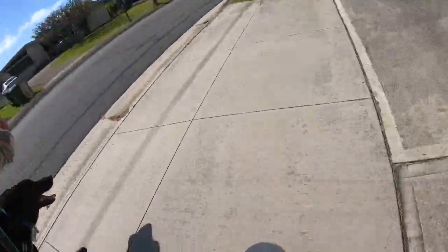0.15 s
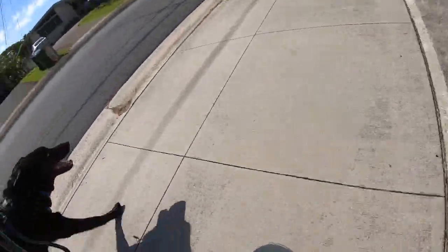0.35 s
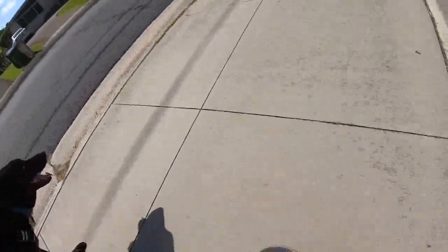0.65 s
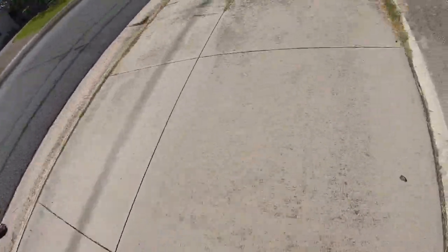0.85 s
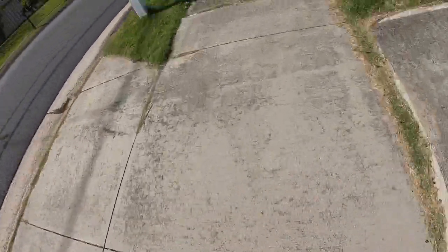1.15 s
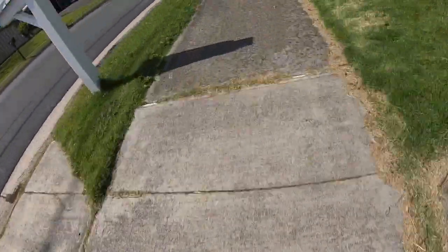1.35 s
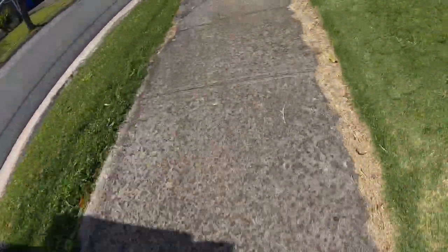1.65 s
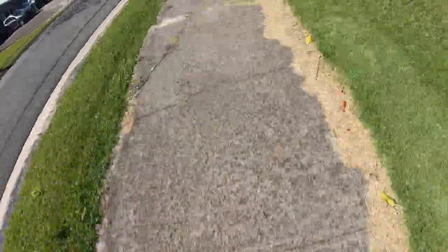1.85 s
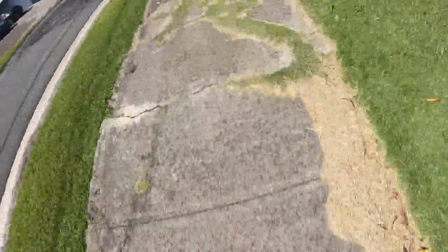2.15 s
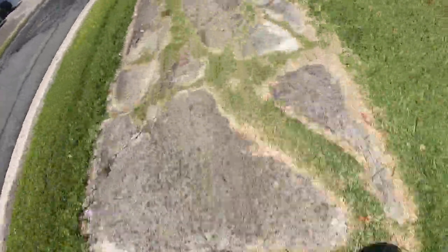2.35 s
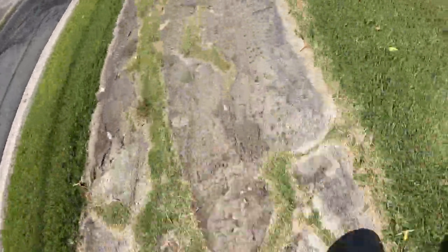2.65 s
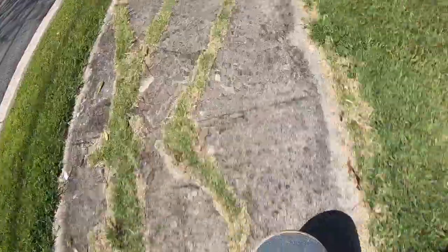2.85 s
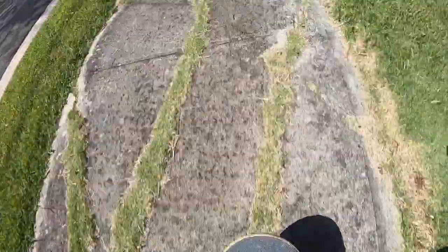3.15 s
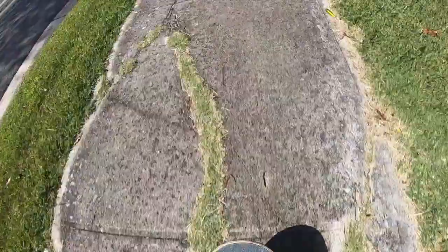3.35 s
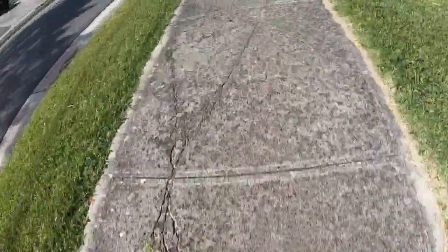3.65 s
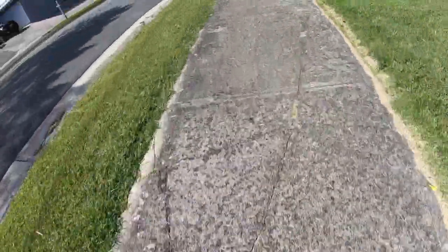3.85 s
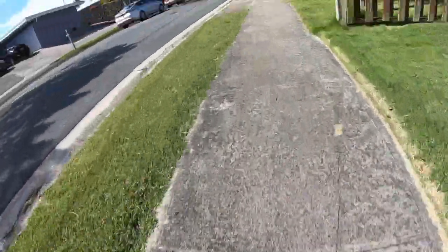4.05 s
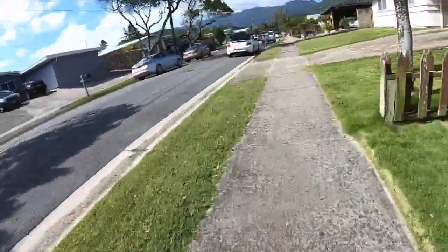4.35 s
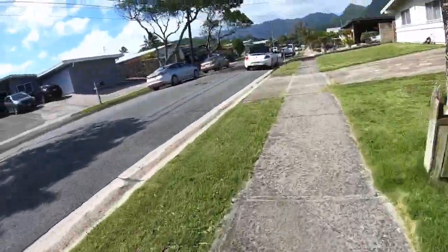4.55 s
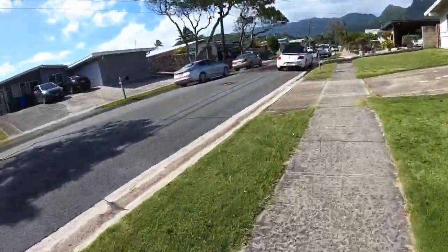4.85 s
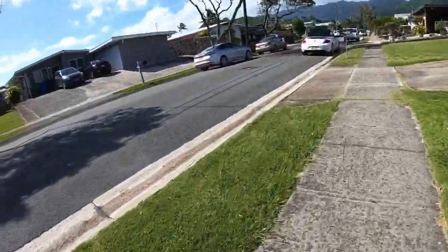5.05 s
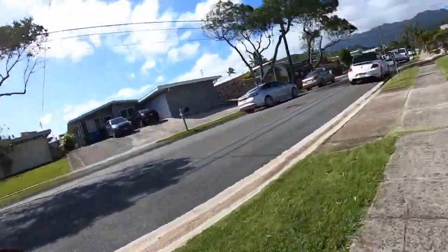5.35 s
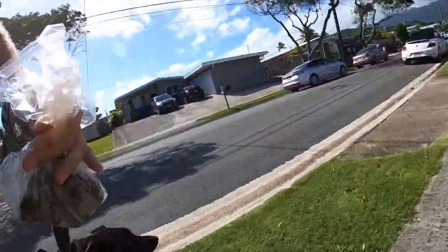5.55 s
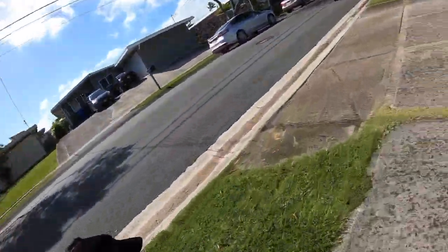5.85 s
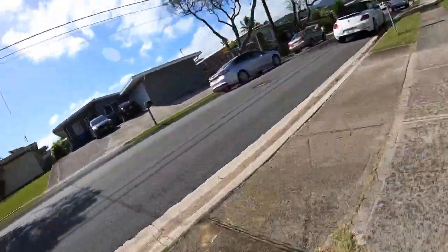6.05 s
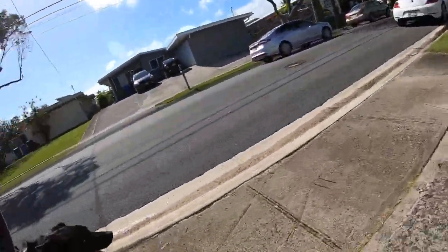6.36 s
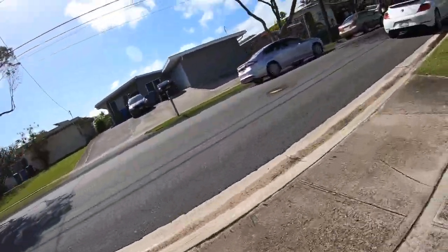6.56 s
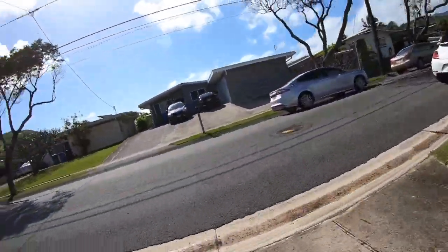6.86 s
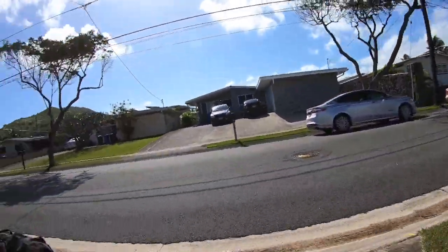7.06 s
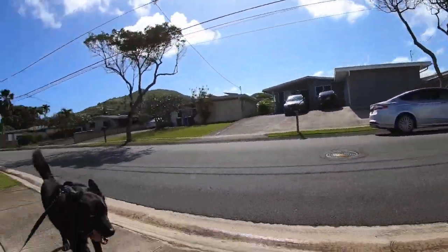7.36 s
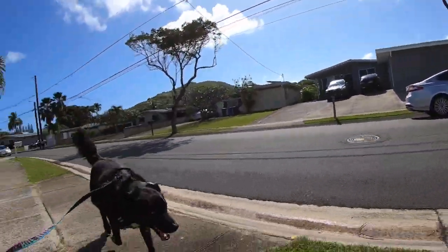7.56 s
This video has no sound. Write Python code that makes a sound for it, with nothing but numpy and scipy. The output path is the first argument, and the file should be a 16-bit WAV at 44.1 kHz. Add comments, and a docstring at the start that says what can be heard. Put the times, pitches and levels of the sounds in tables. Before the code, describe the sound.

Hard skateboard wheels cross rough pavement, heard from just above the board. A quiet start gives way to rapid hollow knocking, gritty rumble and metallic truck chatter over broken slabs for about four seconds. Afterwards it slows into lighter rolling with separate clacks and thin treble ticks like a small clip, sinking almost to wind at the end. Low wind puffs buffet the microphone; distant street air is barely audible.

```python
"""Skateboard wheels on concrete, heard by a camera worn above the board, with wind and a faint street throughout.
From 0.2 s the rough surface shakes the deck, and joints and cracks jolt it: filtered noise and short ringing tones.
Until about 4.2 s the roll is loud and dense; the trucks rattle and the bearings hiss, as noise through resonances.
From 4 s a thin metallic fizz with ticks, perhaps a leash clip, joins in the high treble.
After 5.5 s the rattles and hiss take on a slow-rolling colour, and the roar sinks towards the end."""
import sys
import numpy as np
from scipy import signal
from scipy.fft import rfft, irfft, next_fast_len
from scipy.io import wavfile
from scipy.ndimage import uniform_filter1d, map_coordinates

SR = 44100
rng = np.random.default_rng(int(sys.argv[2]) if len(sys.argv) > 2 else 0)


def put_to_file(sound):
    """Save the sound as 16-bit audio at rate SR, in the file named by the first command-line argument."""
    columns = np.atleast_2d(sound).T  # one column per channel
    safe = np.clip(columns, -1, 1)
    whole_steps = np.round(safe * 32767)
    wavfile.write(sys.argv[1], SR, whole_steps.astype(np.int16))


N = 339570

# Hiss of the bearings before mixing. Each row: time in seconds, level in dB, top of the hiss over that level in dB.
BEARING_HISS = [(0.0, -51, -12), (0.02, -66, -19), (0.56, -65, -24), (0.62, -44.5, -12), (0.79, -63, -28),
                (0.88, -44.5, -20.5), (1.11, -49.5, -11), (1.52, -50.5, -16.5), (2.04, -45, -16),
                (2.06, -63, -3), (2.1, -51.5, -17.5), (2.46, -52, -14), (2.49, -42, -10), (2.51, -54, -10),
                (2.7, -55, -17), (2.85, -58, 0), (2.9, -51, -17), (3.37, -55, -12), (3.79, -53.5, -12),
                (4.12, -56, -11.5), (4.61, -77, 6.5), (5.17, -62.5, -19), (5.28, -67, 0), (5.36, -70, -5),
                (5.64, -65, -13), (5.94, -51, -27.5), (6.69, -51.5, -24), (7.01, -51, -26),
                (7.51, -57.5, -25), (7.7, -50, -28)]
# How far the sound has turned to slow rolling. Each row: time in seconds, share from 0 to 1.
SLOW_SHARE = [(0, 0), (5.55, 0), (5.8, .85), (7.7, .85)]
# Colour of grit on the concrete. Each row: frequency in Hz, gain in dB.
GRIT_COLOUR = [(560, -12.5), (950, -3.5), (1090, -6), (1200, -11), (1580, -17), (1900, -21), (2200, -39),
               (2860, -51), (4840, -120)]
# Colour of low rumble. Each row: frequency in Hz, gain in dB.
RUMBLE_COLOUR = [(60, -50), (110, -10), (165, 0), (285, -9), (400, -35), (900, -140)]


def amp(db):
    """Turn decibels into a plain factor."""
    return 10 ** (np.asarray(db) / 20)


def unit(x):
    """Scale a sound to an rms of 1."""
    return x / np.sqrt(np.mean(x ** 2) + 1e-20)


def curves(rows):
    """One value per sample for each column after the time."""
    s, *cols = np.transpose(rows)
    return [np.interp(np.arange(N) / SR, s, c) for c in cols]


def wobble(rate):
    """A smooth random curve, rate knots a second."""
    knots = rng.standard_normal(int(N * rate / SR) + 4)
    return map_coordinates(knots, [np.arange(N) * rate / SR])


def gate(start, end, fade):
    """1 between two times, with soft edges."""
    t = np.arange(N) / SR
    return np.clip((t - start) / fade, 0, 1) * np.clip((end - t) / fade, 0, 1)


def filtered(x, response):
    """Multiply the spectrum of x by a response of frequency."""
    m = next_fast_len(N + 8192)  # spare room for the ringing
    return irfft(rfft(x, m) * response(np.fft.rfftfreq(m, 1 / SR)), m)[:N]


def colour(points):
    """Response through (Hz, dB) points, read on a log frequency axis."""
    f, db = np.transpose(points)
    return lambda hz: amp(np.interp(np.log(hz + 1), np.log(f + 1), db))


def resonances(modes):
    """Response of damped modes (Hz, width Hz, dB), added with alternating sign."""
    def response(f):
        total = 0
        for k, (centre, width, db) in enumerate(modes):
            damping = 1j * f * width
            total = total + (-1) ** k * amp(db) * damping / (centre * centre - f * f + damping)
        return total
    return response


def twice(modes):
    """Modes passed twice, each pass wider at half the dB, for dark valleys between them."""
    half = resonances([(hz, width * 1.29, db / 2) for hz, width, db in modes])
    return lambda f: half(f) ** 2


def gritty(lumpy_db, rate):
    """Noise of uneven strength, like stone after stone of a rough surface."""
    return unit(amp(lumpy_db * wobble(rate)) * rng.standard_normal(N))


def excite(env, response):
    """Noise shaped by env, then rung through the response at unchanged strength."""
    noise = rng.standard_normal(N)
    return filtered(env * noise, response) / np.std(filtered(noise, response))


def bursts(times, db, lengths, soft):
    """Envelope of short shakes that swell and die; soft rounds the start."""
    env, t = np.zeros(N + SR), np.arange(SR // 5) / SR
    for s, level, length in zip(times, db, np.maximum(lengths, 3e-4)):
        shape = (t / length) ** soft * np.exp(-(t / length) ** 1.2)
        first = max(round(s * SR), 0)
        env[first:][:len(t)] += amp(level) * shape / shape.max()
    return env[:N]


def humps(times, db, lengths, tail):
    """Envelope of bell-shaped swells around their times; tail stretches the fall."""
    env, t = np.zeros(N), np.arange(N) / SR
    for s, level, length in zip(times, db, np.clip(lengths, 1e-3, .03)):
        near = slice(max(int((s - .1) * SR), 0), int((s + .1) * SR))
        late = (t[near] - s) / length
        env[near] += amp(level) * np.exp(-np.where(late > 0, late / tail, late) ** 2)
    return env


def scattered(count, start, level_db, spread_db):
    """Random times after start, with levels a chance step above a level curve, mostly a small one."""
    draw = rng.random((count, 2))
    s = start + draw[:, 0] * (N / SR - start)
    return s, level_db[(s * SR).astype(int)] + spread_db * draw[:, 1] ** 2


def patchy(x, depth_db, size):
    """Random gain in patches about 500 Hz wide and size steps of 6 ms long."""
    z = signal.stft(x, nperseg=512)[2]
    field = uniform_filter1d(rng.standard_normal(z.shape), size=6, axis=0)
    field = uniform_filter1d(field, size=size, axis=1)
    return signal.istft(z * amp(depth_db * unit(field)), nperseg=512)[1][:N]


def surface():
    """Roar of the deck and grit of the concrete in dB; rough patches start and stop abruptly."""
    # Each row: time in seconds, roar of the deck in dB.
    roll_levels = [(0.0, -41), (0.01, -36), (0.14, -54), (0.215, -39), (0.235, -23.5), (0.29, -34),
                   (0.5, -39.5), (0.61, -28), (0.82, -27.5), (0.93, -21.5), (1.46, -19.5), (1.55, -23.5),
                   (2.07, -18), (2.1, -32), (2.18, -14.5), (2.22, -21.5), (2.74, -28.5), (2.75, -21.5),
                   (4.17, -25), (4.23, -31.5), (4.9, -27.5), (4.96, -24), (5.0, -34), (5.22, -28),
                   (5.26, -18.5), (5.32, -25), (5.46, -25.5), (5.49, -33.5), (5.63, -33), (6.13, -37.5),
                   (6.81, -33.5), (6.87, -31.5), (7.06, -38), (7.2, -40.5), (7.3, -39.5), (7.36, -47),
                   (7.5, -41.5), (7.7, -44)]
    # Rough patches of concrete. Each row: start and end in seconds, grit over the roar in dB.
    rough_patches = [(0.215, 0.294, -12), (0.572, 0.654, -6.5), (0.665, 1.238, -12), (1.237, 1.388, -7),
                     (1.419, 1.745, -11), (1.745, 2.88, -7.5), (2.903, 3.448, -13.5), (3.441, 4.2, -9),
                     (4.742, 4.994, -9), (5.237, 5.457, -8.5), (5.536, 5.63, -14), (5.758, 5.81, -22),
                     (6.001, 6.158, -7.5), (6.856, 7.259, -14), (7.251, 7.8, -4.5)]
    smooth_db, edge_s = -19, 0.0061  # grit over the roar between patches; edge of a patch
    roar_db, = curves(roll_levels)
    rough_db = sum((db - smooth_db) * gate(start, end + edge_s, edge_s) for start, end, db in rough_patches)
    return roar_db, roar_db + smooth_db + rough_db


def street():
    """Far traffic and leaves: smooth, faint, coloured noise."""
    # Each row: frequency in Hz, gain in dB.
    street_colour = [(180, -34), (300, -11.5), (391, -21.5), (500, 0), (620, 6.5), (760, -14.5), (900, -24),
                     (1280, -32), (1800, -34), (2710, -48.5), (6350, -51), (10000, -81), (13000, -103),
                     (22000, -120)]
    return amp(-44.5) * unit(filtered(rng.standard_normal(N), colour(street_colour)))


def wind():
    """Headwind buffets the microphone: three bands of low noise that swell in random lumps."""
    # Each row: time in seconds, then levels of deep buffet, throb and rumble in dB.
    wind_levels = [(0.0, -43, -22.5, -35), (0.04, -32, -34, -28), (0.09, -22, -28, -34),
                   (0.13, -35, -34, -37.5), (0.43, -25.5, -34, -38.5), (0.47, -33, -31, -42),
                   (0.71, -21.5, -28, -42), (0.77, -29.5, -30, -39), (1.74, -32.5, -38, -42.5),
                   (1.78, -38.5, -29, -35), (2.32, -28, -27, -26), (2.42, -37, -20, -24.5),
                   (2.59, -32.5, -28.5, -37.5), (3.71, -35, -37.5, -24), (3.97, -22, -26, -26.5),
                   (4.14, -33, -31, -35.5), (4.8, -35, -32.5, -33), (5.17, -38.5, -29.5, -39.5),
                   (5.32, -26, -18.5, -21), (5.38, -30.5, -32, -28), (5.68, -50, -29.5, -36),
                   (5.88, -39, -25.5, -37.5), (6.13, -33, -37, -36), (6.199, -29.5, -25, -29),
                   (6.41, -37, -40, -39), (6.47, -32, -37, -32), (6.551, -38, -41, -35),
                   (6.69, -31, -29.5, -33), (6.78, -35, -47, -31), (6.845, -31, -32, -24),
                   (6.9, -33.5, -39.5, -41), (7.61, -37, -42, -41), (7.7, -33, -41, -41)]
    # Colours of the two lower layers. Each row: frequency in Hz, gain in dB.
    buffet_colour = [(8, -40), (18, -8), (45, 0), (70, -4), (120, -24), (200, -70), (500, -140)]
    throb_colour = [(35, -50), (60, -12), (100, 0), (150, -12), (260, -60), (600, -140)]
    gust_rate, own_db, shared_db = 9, 1.5, 1  # knots a second; lumps of each layer and of all layers in dB
    gust_db = shared_db * wobble(gust_rate)
    total = 0
    layers = []
    for tone in (buffet_colour, throb_colour, RUMBLE_COLOUR):
        air = filtered(gritty(own_db, rate=gust_rate), colour(tone))
        layers.append(unit(amp(gust_db) * air))
    for db, layer in zip(curves(wind_levels), layers):
        total = total + amp(db) * layer
    return total


def bumps(steady):
    """Puffs and knocks on the camera, a cycle or two of low push each; the steady wind gives way to them."""
    # Low bumps. Each row: time in seconds, level in dB before the trim below, pitch in Hz before it wavers.
    bump_rows = [(0.04, -16.5, 152.6), (0.089, -20.5, 100), (0.264, -16.5, 100.4), (0.384, -18, 79.5),
                 (0.588, -11, 99.7), (0.615, -18.5, 90), (0.662, -18.0, 99), (0.703, -13.0, 89),
                 (0.741, -17, 80.64), (0.852, -13.5, 98.8), (0.938, -20, 150.9), (1.108, -21.5, 110.7),
                 (1.134, -17, 89.8), (1.201, -23, 99.3), (1.227, -24.0, 90.4), (1.292, -21, 109.7),
                 (1.367, -19.5, 100), (1.405, -18, 139), (1.602, -18, 140.9), (1.768, -19, 109.9),
                 (1.794, -21, 120.6), (1.834, -14, 110), (1.898, -20, 139), (1.937, -18.5, 120.4),
                 (2.071, -10, 120.1), (2.124, -12, 120.4), (2.18, -13, 139.3), (2.273, -16, 139.6),
                 (2.318, -15, 109.8), (2.351, -13.5, 130.2), (2.412, -17.5, 139.8), (2.433, -14, 160),
                 (2.467, -19, 119.7), (2.687, -21.5, 140), (2.763, -14, 110), (2.79, -20, 109.8),
                 (2.886, -20, 200), (2.967, -22, 110), (2.997, -16.5, 120.1), (3.119, -17, 130.2),
                 (3.164, -18, 149.2), (3.257, -12, 169.9), (3.407, -20, 160.1), (3.467, -12, 180.2),
                 (3.538, -14.5, 150), (3.57, -15, 180.3), (3.61, -6, 179.1), (3.655, -16.0, 179.4),
                 (3.683, -15.0, 189.6), (3.721, -12.5, 170.3), (3.747, -13.5, 150.7), (3.815, -14, 201.1),
                 (3.84, -15, 139.7), (3.862, -15, 199.9), (3.923, -14, 150), (3.946, -16, 109.5),
                 (3.972, -12.5, 139.8), (4.01, -21, 159.6), (4.064, -18.5, 190.7), (4.265, -16, 129.9),
                 (4.333, -18.5, 179.6), (4.364, -17, 120.7), (4.416, -18, 140), (4.694, -15, 120.1),
                 (4.758, -20.5, 210), (4.787, -22, 159.2), (4.834, -13, 138), (4.861, -19.5, 109.6),
                 (4.915, -19, 189), (4.953, -13.5, 160), (5.279, -16.5, 170), (5.309, -14, 99.84),
                 (5.328, -11.5, 150.5), (5.393, -15, 209.2), (5.497, -17, 160.1), (5.61, -14.5, 130),
                 (5.743, -19, 120), (5.844, -15, 99.9), (5.874, -24, 100), (5.918, -14, 99.9),
                 (5.944, -17, 120.4), (6.159, -23, 150), (6.191, -18.0, 120), (6.229, -13, 100),
                 (6.272, -16, 130.2), (6.391, -15, 180), (6.466, -17, 139), (6.598, -16.5, 140),
                 (6.681, -19, 110), (6.705, -13, 200.7), (6.754, -18, 180), (6.844, -14.0, 139.4),
                 (6.912, -23, 109.8), (6.963, -17.5, 120), (6.997, -24.0, 99.8), (7.169, -25.5, 119.7),
                 (7.24, -22, 110), (7.351, -25, 109.6), (7.659, -26.5, 130)]
    length_s, trim_db, calm = 0.0067, -2.5, 1.1  # calm: how far a bump takes the place of the wind
    s, db, pitch_hz = np.transpose(bump_rows)
    hz = np.interp(np.arange(N) / SR, s, pitch_hz) * (1 + 0.0994 * wobble(40))
    push = humps(s, db + trim_db, np.full(len(s), length_s), tail=1.01)
    calmed = steady / np.sqrt(1 + (calm * push / steady.std()) ** 2)
    return push * np.sin(2 * np.pi * np.cumsum(hz) / SR) + calmed


def fizz():
    """Thin treble fizz, made of uneven high noise, with single ticks, loud and faint."""
    # Each row: time in seconds, level of the fizz in dB.
    fizz_levels = [(4.0, -83), (4.7, -90), (5.4, -78.5), (6.2, -81), (7.7, -76.5)]
    # Louder ticks. Each row: time in seconds, level in dB before the trim below.
    tick_rows = [(4.631, -57), (5.127, -60), (5.2277, -63), (5.247, -63), (5.542, -50), (5.751, -73),
                 (6.0204, -53.5), (6.2704, -61), (6.4056, -48), (6.445, -53.5), (6.602, -60.5),
                 (6.605, -52), (6.752, -57), (6.806, -50), (6.8548, -75), (7.114, -59), (7.221, -47.5),
                 (7.4363, -63)]
    # Each row: frequency in Hz, gain in dB.
    thin_colour = [(9500, -120), (11400, -14), (11900, -2), (12400, 0), (13000, -3), (14300, -8),
                   (15700, -11)]
    faint_count, faint_db, spread_db = 40, 13, 4.5  # faint ticks: how many, least level over the fizz, spread
    length_s, trim_db = .0022, -9.0
    fizz_db, = curves(fizz_levels)
    faint = scattered(faint_count, 4.6, fizz_db + faint_db, spread_db)
    s, db = np.hstack([np.transpose(tick_rows), faint])
    steady = gate(4.0, 9, .3) * amp(fizz_db) * unit(filtered(gritty(3.5, rate=90), colour(thin_colour)))
    tick_env = bursts(s - .002, db + trim_db, np.full(len(s), length_s), soft=1.6)
    return steady + excite(tick_env, colour(thin_colour))


def metal(env):
    """Noise shakes the metal of the trucks; at low speed other resonances stand out."""
    # Modes in normal and in slow rolling. Each row: pitch in Hz, width in Hz before twice() widens it, level in dB.
    truck_modes = [(2460, 640, -8.5), (3170, 420, 1.5), (3810, 496, 0), (4810, 540, -6.5), (5680, 410, -9)]
    slow_modes = [(1620, 120, -17), (2230, 120, 2), (3080, 450, -6.5), (4030, 570, -7.5), (4670, 460, -10),
                  (5440, 820, -13), (6600, 1200, -20)]
    turn = curves(SLOW_SHARE)[0] * np.pi / 2
    return excite(env * np.cos(turn), twice(truck_modes)) + excite(env * np.sin(turn), twice(slow_modes))


def bearings():
    """Bearings hiss as uneven noise, partly through the truck's resonances."""
    # Colours of the main hiss and its top. Each row: frequency in Hz, gain in dB.
    hiss_colour = [(1120, -37), (1900, -5), (2040, 0.5), (2210, -1), (2590, -2), (3330, -6), (3930, -9),
                   (4830, -13), (5610, -13), (6800, -29), (8840, -57.5), (15000, -120)]
    hiss_top_colour = [(3650, -29.5), (6200, 1), (7490, 0.5), (8150, 1.5), (8970, -3.5), (10800, -18),
                       (11500, -15), (15000, -49), (22000, -120)]
    slow_ring_db, shake_db = -5, -24  # change of the ringing at full slow share; truck shaking under the grit
    hiss_db, top_db = curves(BEARING_HISS)
    slow = curves(SLOW_SHARE)[0]
    lumps_db = 2.0 * wobble(25) + 0.54 * wobble(150)
    plain = unit(filtered(gritty(3.5, rate=290), colour(hiss_colour)))
    plain = amp(-2.5) * np.cos(slow * np.pi / 2) * plain
    ringing = amp(-10.0 + slow_ring_db * slow) * metal(amp(0.92 * wobble(60)))
    top = unit(filtered(gritty(2.9, rate=350), colour(hiss_top_colour)))
    grit_db = surface()[1]
    shaken = excite(amp(grit_db + shake_db + 2.7 * wobble(120)), colour(hiss_colour))
    hiss = amp(hiss_db + lumps_db) * (plain + ringing + amp(top_db) * top)
    return patchy(hiss + shaken, depth_db=2, size=20)  # the colour drifts


def lingering():
    """Narrow bands of hiss that each wander a little in pitch, flutter, hold and fade."""
    # Each row: start and end in seconds, pitch in Hz, width in Hz, level in dB.
    band_rows = [(.65, .76, 3100, 300, -56), (.67, .78, 2630, 500, -54), (.74, .88, 2300, 250, -55.5),
                 (.8, .89, 2950, 400, -51), (.225, .31, 2007, 1200, -58), (.72, .9, 3360, 400, -71),
                 (1.2, 1.4, 2396, 699, -51), (.66, .74, 6540, 700, -63), (.66, .7, 5700, 200, -65),
                 (.71, .76, 5300, 500, -66), (1.75, 2.04, 2570, 400, -59), (1.8, 2.04, 4100, 900, -58),
                 (2.1, 2.46, 2502, 450, -57), (2.12, 2.22, 4107, 900, -51), (2.22, 2.46, 3847, 800, -54),
                 (2.1, 3.3, 5710, 300, -77), (3.05, 3.5, 3009, 600, -59), (3.86, 4.03, 4244, 500, -60),
                 (2.2, 2.9, 8305, 350, -74), (3.93, 4.04, 3210, 200, -54), (4.08, 4.36, 3100, 300.8, -61),
                 (4.18, 4.35, 4088, 398, -65), (4.12, 4.68, 4916, 130.1, -70.5),
                 (4.18, 4.56, 5540, 260, -67.5), (4.2, 4.35, 2720, 496, -55), (4.2, 4.34, 7900, 900, -73),
                 (4.2, 4.3, 6255, 300, -71), (4.3, 4.6, 3325, 220.3, -65), (4.34, 4.47, 2640, 120, -67),
                 (4.33, 4.58, 2990, 180, -61.5), (4.5, 4.66, 3110, 99.7, -68), (4.44, 4.6, 6000, 350, -67),
                 (4.6, 4.74, 6440, 403, -72), (4.75, 4.97, 1750, 500, -69), (5.25, 5.47, 1775, 550, -47.5),
                 (5.85, 6.08, 3088, 500, -63.5), (5.92, 6.0, 2230, 303, -59.5),
                 (6.01, 6.17, 2190, 300, -56), (6.02, 6.18, 1666, 200, -52), (6.3, 6.92, 2238, 301.4, -74),
                 (7.08, 7.25, 2187, 298, -64), (6.45, 6.68, 2817, 250.4, -75),
                 (6.94, 7.08, 1894, 1009, -54), (7.12, 7.22, 3170, 200, -69), (7.08, 7.7, 4495, 598.2, -70),
                 (7.2, 7.45, 3150, 298.7, -75), (7.44, 7.7, 1460, 250, -56), (7.52, 7.66, 3127, 250, -64)]
    fade_s = .02
    out = np.zeros(N)
    drift = .003 * wobble(14)  # share of the pitch
    flutter = amp(2 * wobble(45) + 1.5 * wobble(10))  # quick and slow wavering in dB
    for k, (start, end, hz, width, db) in enumerate(band_rows):
        i = np.arange(int(start * SR), min(int(end * SR), N))
        noise = rng.standard_normal((2, N // 6))[:, :len(i)]
        slow = signal.lfilter(*signal.butter(3, width / 2, fs=SR), noise[0] + 1j * noise[1])
        own = (i + k * SR // 3) % N  # each band reads another stretch of the wavering
        carrier = np.exp(2j * np.pi * np.cumsum(hz * (1 + drift[own])) / SR)
        band = unit((slow * carrier).real)  # slow noise moved up to the band's pitch
        fade = np.clip(np.minimum(i - i[0], i[-1] - i) / SR / fade_s, 0, 1)
        out[i] += amp(db) * fade * flutter[own] * band
    return out


def trucks():
    """Loose metal parts chatter when shaken: loud shakes, scrapes, and small shakes that follow the hiss."""
    # Loudest rattles. Each row: time in seconds, level in dB before the trims below, brightness in dB.
    rattle_rows = [(0.226, -52, -29), (0.402, -44, -29), (0.8358, -51, -32), (0.893, -26, -24),
                   (1.127, -30.5, -14), (1.159, -36.5, -14), (1.358, -33, -10.5), (1.374, -36, -16),
                   (1.591, -35, -6), (1.74, -32, -28), (1.887, -25.5, -27), (1.945, -41.5, -22),
                   (1.996, -32.5, -19), (2.059, -21.5, -18), (2.1154, -40, -29), (2.229, -34, -29),
                   (2.288, -47, -22), (2.4212, -44, -20), (2.484, -22, -16), (2.5342, -25, -14.5),
                   (2.525, -36.5, -19), (2.578, -42, -14), (2.68, -36, -28), (2.742, -31.5, -18),
                   (2.61, -23.5, -24), (2.771, -38, -23), (2.794, -28.5, -12), (2.842, -36.5, -23),
                   (2.859, -26, -24), (2.919, -30, -22), (2.987, -33, -41), (3.0189, -32, -29),
                   (3.3377, -32, -21), (3.42, -34.5, -15), (3.5144, -28, -28), (3.588, -34, -18),
                   (3.606, -33.5, -17), (3.635, -26, -18), (3.6638, -26, -15), (3.688, -26.5, -19),
                   (3.7524, -34.5, -12), (3.7917, -26, -19), (3.8017, -21.5, -17), (3.835, -18.5, -22),
                   (3.9086, -26, -23), (3.9716, -36, -29), (4.003, -30.5, -27), (4.064, -37, -29),
                   (4.15, -33, -26), (4.165, -35.5, -26), (4.21, -49, 4), (4.331, -36.5, -10),
                   (4.548, -53, -9), (4.632, -53, 1), (4.755, -44, -8), (4.8, -47, -25), (4.905, -42, -19),
                   (4.952, -45, -15), (5.217, -39, -25), (5.244, -46, -21), (5.2601, -44.5, -8),
                   (5.285, -45.5, -25), (5.335, -53, -28), (5.39, -46, -29), (5.443, -45, -29),
                   (5.56, -41.5, -22), (5.622, -40.5, -26), (5.776, -40, -33), (5.797, -48, -35),
                   (6.019, -29.5, -30), (6.05, -40.5, -28), (6.115, -48, -34), (6.15, -46.5, -32),
                   (6.271, -37, -28), (6.388, -35.5, -24), (6.405, -38.5, -20), (6.431, -32.5, -26),
                   (6.446, -33.5, -25), (6.59, -44, -29), (6.605, -23, -22), (6.701, -37, -26),
                   (6.808, -44, -14), (6.854, -28, -32), (7.035, -43, -28), (7.134, -42, -34),
                   (7.152, -45, -34), (7.207, -37.5, -36), (7.2547, -47, -27), (7.325, -46, -30),
                   (7.437, -58, -8)]
    # Longer scrapes over broken concrete. Each row: start and end in seconds, level in dB, brightness in dB.
    scrape_rows = [(0.586, 0.656, -51, -33), (2.04, 2.064, -39.5, -18), (2.415, 2.469, -49, -19),
                   (2.463, 2.499, -43, -19), (2.796, 2.868, -44.5, -9.5), (3.607, 3.625, -48, -14),
                   (3.644, 3.669, -46, -15), (3.805, 3.836, -53, -10), (3.895, 3.94, -53, -14),
                   (5.268, 5.288, -74, 7), (5.771, 5.81, -63, -31), (6.002, 6.155, -62.5, -15),
                   (7.25, 7.301, -59.5, -21), (7.443, 7.486, -60, -22), (7.555, 7.59, -56, -21)]
    # Top resonances. Each row: pitch in Hz, width in Hz before twice() widens it, level in dB.
    truck_top_modes = [(6800, 1000, -4), (8280, 690, 3), (9070, 860, -5), (10400, 770, -7.5),
                       (12500, 1500, -15.5)]
    length_s, metal_db, top_trim_db, body_db = 0.0051, -17, -12, -4  # trims for metal, top and grit
    small_count, small_db, spread_db, small_bright_db = 150, 3, 14.5, -19.5  # least level over the hiss; spread
    slow_loss_db, slow_body_db = 9, 10  # lost at full slow share: by small rattles, by the grit of all rattles
    slow = curves(SLOW_SHARE)[0]
    s, db, bright_db = np.transpose(rattle_rows)
    small_curve = curves(BEARING_HISS)[0] + small_db - slow_loss_db * slow
    small_s, small_level = scattered(small_count, 0.45, small_curve, spread_db)
    s, db = np.append(s, small_s), np.append(db, small_level)
    bright_db = np.append(bright_db, np.full(small_count, small_bright_db))
    chatter = amp(3.7 * wobble(500))  # many contacts inside each shake

    def shake(level):
        return chatter * bursts(s - .005, level, np.full(len(s), length_s), soft=1.46)

    def top(f):
        return twice(truck_top_modes)(f) / (1 + (f / 13500) ** 10)

    contacts = amp(3.4 * wobble(260))
    scrape = contacts * sum(amp(level) * gate(start, end, 0.0053) for start, end, level, _ in scrape_rows)
    scrape_top = contacts * sum(amp(level + bright) * gate(start, end, 0.0085)
                                for start, end, level, bright in scrape_rows)
    ringing = metal(shake(db + metal_db) + scrape)
    treble = excite(shake(db + bright_db + top_trim_db) + scrape_top, top)
    body = excite(shake(db + body_db) * amp(-slow_body_db * slow), colour(GRIT_COLOUR))
    return ringing + treble + body


def cracks():
    """A wheel hits a slab edge: one hard push with a short rasp; a sharper edge sounds brighter."""
    # Each row: time in seconds, level in dB before a 6.5 dB lift, sharpness in Hz.
    crack_rows = [(0.5978, -6, 700), (2.0617, -13, 3005), (2.793, -18, 4034), (3.834, -28, 3200),
                  (6.2726, -19.5, 3500), (6.4473, -19, 3225), (6.607, -23, 2800), (6.703, -25, 2800),
                  (6.857, -16, 2793)]
    out, t = np.zeros(N + SR), np.arange(SR // 100) / SR
    for s, db, sharp_hz in crack_rows:
        u = 2 * np.pi * sharp_hz * t
        rasp = signal.lfilter([u[1]], [1, u[1] - 1], rng.standard_normal(len(t)))
        push = u * (2 - u) * np.exp(-u) + 0.099 * np.exp(-t / 0.0018) * rasp
        lowpass = signal.butter(2, min(6.6 * sharp_hz, SR / 2.2), fs=SR)
        out[round(s * SR):][:len(t)] += amp(db + 6.5) * signal.lfilter(*lowpass, push)
    return filtered(out[:N], lambda f: (1j * f / (600 + 1j * f)) ** 2 / (1 + 1j * f / 7000) ** 4)


def rung(env, response):
    """A resonance kept ringing fairly evenly for as long as env shakes it."""
    steady = 0.54  # evenness, 0 to 1
    tone = filtered(rng.standard_normal(next_fast_len(N)), response)
    swing = np.abs(signal.hilbert(tone, next_fast_len(N))[:N])
    even = tone / (swing + 0.24 * tone.std()) ** steady
    return filtered(env * unit(even), lambda f: 1 / (1 + (f / 1300) ** 6) / (1 + (330 / (f + 1)) ** 6))


def knocked(times, pitch_hz, env, response):
    """Each jolt favours one wavering pitch of the deck, with the other modes under it."""
    hz = np.interp(np.arange(N) / SR, times, pitch_hz) * (1 + 0.065 * wobble(160))
    tone = np.sqrt(2) * np.sin(2 * np.pi * np.cumsum(hz) / SR)
    return env * tone + amp(-3.5) * rung(env, response)


def deck():
    """The plywood rings to the surface all the time and harder at each jolt."""
    # Load on the deck. Each row: time in seconds, low mode in dB, stiffness in dB (how far upper modes are favoured).
    load_rows = [(0.0, -53, -5), (0.21, -38.5, -3.5), (0.86, -52.5, -2), (1.44, -27.5, 1), (1.63, -38, 5.5),
                 (1.95, -24, 0), (2.66, -40.5, 13), (3.04, -26, 11.5), (3.95, -27.5, 6.5), (4.35, -35, 1),
                 (4.8, -27, 6.5), (5.06, -47.5, -4), (5.25, -34, -4.5), (6.09, -44, 9), (6.4, -39.5, -10),
                 (6.8, -34, -5), (7.1, -42.5, 9), (7.7, -48.5, -11)]
    # Jolts at joints and cracks. Each row: time in seconds, level in dB before the trims below, length in seconds,
    # thud over that level in dB, pitch in Hz before it wavers.
    jolt_rows = [(0.204, -22, 0.0055, -15, 584), (0.239, -15.5, 0.014, -12.5, 569),
                 (0.276, -21, 0.0034, -5, 622), (0.346, -22.5, 0.0038, -8, 537),
                 (0.598, -17, 0.0028, -10, 788), (0.612, -14.5, 0.0034, -13.5, 628.3),
                 (0.622, -21, 0.0033, -11, 650), (0.647, -16, 0.005, -16.5, 613.4),
                 (0.682, -21.5, 0.0065, -13.5, 602.5), (0.7, -23, 0.0041, -6, 601.5),
                 (0.736, -17.5, 0.018, -13.5, 655.5), (0.842, -18, 0.0046, -19.5, 609),
                 (0.871, -17, 0.0059, -13, 641), (0.918, -15.5, 0.0057, -20, 672.4),
                 (0.942, -10.5, 0.0037, -24.5, 597), (0.954, -15.5, 0.0041, -15.5, 627),
                 (0.98, -11, 0.004, -20.5, 650.5), (1.029, -11.0, 0.0063, -25, 615),
                 (1.064, -14.5, 0.0032, -22, 660), (1.11, -13.0, 0.005, -14, 610),
                 (1.168, -16.5, 0.0043, -26, 600), (1.217, -11.5, 0.0041, -23.5, 640),
                 (1.282, -12, 0.0069, -22.5, 750), (1.298, -20, 0.0077, -18, 670),
                 (1.365, -9, 0.0037, -16.5, 769), (1.4, -9, 0.0094, -13, 573),
                 (1.441, -15, 0.0041, -16, 567), (1.461, -14, 0.0076, -20.5, 690),
                 (1.49, -15.5, 0.0026, -19, 619), (1.743, -17.5, 0.011, -15, 650),
                 (1.835, -13.5, 0.01, -15.5, 758), (1.853, -15.5, 0.0058, -17, 560.4),
                 (1.867, -11, 0.0065, -13, 631), (1.885, -15, 0.0036, -10, 687.4),
                 (1.905, -14, 0.0059, -17, 691.4), (1.934, -12.5, 0.006, -17, 670.6),
                 (1.95, -9.5, 0.0047, -20, 731), (1.977, -12.5, 0.0029, -19.5, 739.6),
                 (1.996, -10.5, 0.0035, -15, 693), (2.017, -14, 0.0035, -17, 707),
                 (2.049, -12, 0.005, -13, 610), (2.06, -9.0, 0.0047, -15.5, 780),
                 (2.07, -17.5, 0.0039, 0, 595), (2.167, -10.5, 0.0046, -17.5, 735.4),
                 (2.177, -9, 0.0038, -14, 613), (2.197, -11, 0.0061, -11.5, 759),
                 (2.228, -14.5, 0.0042, -14, 790), (2.353, -11, 0.0054, -10, 700),
                 (2.379, -18, 0.0062, -10.5, 660), (2.39, -15.5, 0.0061, -15.5, 711.5),
                 (2.451, -17.5, 0.0041, -14.5, 725), (2.506, -11.5, 0.0072, -12.5, 741),
                 (2.692, -13, 0.0064, -11, 693.4), (2.75, -12, 0.0052, -17.5, 758),
                 (2.775, -14, 0.0034, -18, 667.6), (2.804, -11, 0.0059, -14.5, 761.3),
                 (2.816, -14, 0.006, -20, 702.4), (2.872, -10, 0.0047, -22, 691.5),
                 (2.884, -13, 0.0061, -13.5, 670), (2.92, -7.5, 0.0043, -13.5, 750.6),
                 (3.009, -17.5, 0.0032, -16, 670), (3.119, -14.5, 0.0031, -5, 618.7),
                 (3.135, -16.5, 0.011, -13.5, 580), (3.172, -12.5, 0.0061, -11, 730),
                 (3.234, -12, 0.0048, -16, 659), (3.253, -17.5, 0.0038, -5, 630),
                 (3.261, -12, 0.0039, -7, 629.7), (3.35, -11.5, 0.0048, -19, 700),
                 (3.408, -12.5, 0.0054, -15.5, 705.3), (3.438, -11, 0.003, -12.5, 622),
                 (3.477, -13, 0.0058, -6, 720), (3.523, -10.5, 0.0078, -7, 710),
                 (3.628, -15.5, 0.0053, -8, 680), (3.639, -13.5, 0.0061, -11, 609),
                 (3.657, -11, 0.0045, -5.5, 690), (3.719, -17, 0.0063, -3.5, 600),
                 (3.757, -13, 0.0048, -3.5, 560), (3.795, -10.5, 0.0045, -18, 698),
                 (3.822, -13, 0.0029, -8.5, 640), (3.847, -11, 0.0084, -8, 755),
                 (3.921, -7, 0.0056, -7, 656), (3.936, -20.5, 0.0034, -6, 664.5),
                 (4.006, -10.5, 0.0029, -10.5, 740), (4.022, -16.5, 0.0072, -15, 617),
                 (4.066, -8.5, 0.0041, -17, 620), (4.074, -16, 0.0029, -15.5, 619),
                 (4.122, -23, 0.004, -11.5, 600), (4.137, -17.5, 0.0042, -13.5, 726),
                 (4.154, -10.5, 0.0031, -15, 650), (4.167, -21.5, 0.0027, -8.5, 585.4),
                 (4.201, -18.5, 0.0061, -4.5, 629), (4.291, -22.5, 0.005, -2.5, 620),
                 (4.487, -18, 0.0095, -13.5, 583), (4.688, -21.5, 0.0088, -9.5, 643),
                 (4.741, -20, 0.011, -14, 511.7), (4.763, -13.5, 0.0079, -8.5, 640),
                 (4.775, -19, 0.0041, -13.5, 532.7), (4.791, -25.5, 0.0092, -4.5, 631.3),
                 (4.808, -22.5, 0.0029, -11, 630), (4.83, -25.5, 0.0034, -1, 580),
                 (4.844, -20.5, 0.0058, -7.5, 651), (4.901, -18.5, 0.0032, -14.5, 649.7),
                 (4.91, -14.0, 0.0062, -13, 650), (4.938, -18.5, 0.0053, -6, 656),
                 (4.951, -14, 0.0071, -12, 638), (4.971, -15, 0.0036, -3.5, 735),
                 (5.162, -19.5, 0.0054, -14.5, 598), (5.231, -22.5, 0.0063, -9, 620),
                 (5.256, -10.5, 0.0054, -18, 541.3), (5.294, -12, 0.0032, -11.5, 710),
                 (5.308, -17.5, 0.009, -4.5, 689.4), (5.34, -13.0, 0.0036, -1, 648.5),
                 (5.348, -11.5, 0.0034, -1.5, 710), (5.359, -17, 0.0026, -8.5, 587),
                 (5.386, -16.5, 0.0047, -6, 667), (5.397, -11, 0.0037, -9.5, 649),
                 (5.429, -14, 0.0033, -15, 653.5), (5.445, -13.5, 0.0091, -13, 690),
                 (5.468, -20.5, 0.0047, -9, 662), (5.569, -17, 0.0033, -13.5, 631),
                 (5.59, -22.5, 0.0039, -8.5, 670), (5.615, -23, 0.01, 1.5, 530),
                 (5.785, -17, 0.0079, -11.5, 666), (6.021, -20, 0.0036, -5.5, 544),
                 (6.031, -23, 0.0055, -9, 652), (6.118, -20.5, 0.0069, -12.5, 699),
                 (6.273, -20.5, 0.0032, -4, 594.6), (6.394, -15, 0.0057, -1.5, 600),
                 (6.426, -13, 0.0052, -10.5, 659.7), (6.439, -14.0, 0.004, -13.5, 623),
                 (6.587, -26, 0.0062, 0.5, 600), (6.601, -13, 0.0033, -4, 510),
                 (6.703, -14, 0.0064, 0, 568), (6.763, -21.5, 0.0083, -3.5, 559),
                 (6.858, -15, 0.0036, -6.5, 530), (6.912, -24.5, 0.0048, -7.5, 562),
                 (6.989, -23.5, 0.0066, -12.5, 620), (7.21, -28.5, 0.0047, -15.5, 730),
                 (7.257, -25, 0.0039, -15, 640), (7.275, -26.5, 0.0039, -7, 660),
                 (7.289, -18, 0.0055, -16, 582), (7.469, -23.5, 0.0041, -18, 531),
                 (7.561, -27.5, 0.0062, -7, 590), (7.578, -26, 0.0071, -8, 551)]
    # Main modes of the wood. Each row: pitch in Hz, width in Hz, level in dB.
    wood_modes = [(532, 85.8, 2.5), (677.4, 132.7, 3), (775.3, 101, 1.5), (987, 320, -19.5)]
    # Low modes. Each row: pitch in Hz, width in Hz before twice() widens it, level in dB.
    low_modes = [(305, 31.6, -6.5), (400.3, 120, -1.5)]
    ring_db, edge_db, thump_db, thud_trim_db = -5, -10.5, -7.5, -7  # trims of the four parts of a jolt
    edge_follows = 1  # share of the surface grit that a jolt's edge takes on
    lift = 0.88  # how far a jolt lifts the wheels off the surface and so hushes the roar
    roar_db, grit_db = surface()
    low_db, stiff_db = curves(load_rows)
    s, db, length, thud_db, pitch_hz = np.transpose(jolt_rows)
    wood = resonances(wood_modes)

    def dulled(f):
        # soft wheels and the camera case dull the top; the lows are cut too
        return wood(f) / (1 + 1j * f / 1500) ** 2 * (1j * f / (350 + 1j * f)) ** 2

    def upper(f):
        return 1 / (1 + (680 / (f + 1)) ** 10)

    lumps = wobble(35)
    ring = amp(roar_db) * unit(filtered(amp(.7 * lumps) * gritty(1.2, rate=330), dulled))
    high = filtered(ring, upper)
    roar = amp(stiff_db / 2) * high + amp(-stiff_db / 2) * (ring - high)
    low = amp(low_db) * unit(filtered(amp(2.6 * lumps) * gritty(2.6, rate=66), twice(low_modes)))
    grit = amp(grit_db) * unit(filtered(amp(2.5 * lumps) * gritty(3, rate=200), colour(GRIT_COLOUR)))

    blows = humps(s, db, length, tail=0.99)
    thuds = humps(s, db + thud_db, 1.23 * length, tail=1.13)
    hush = 1 / np.sqrt(1 + (lift * blows / amp(roar_db)) ** 2)
    jolt_ring = amp(ring_db) * knocked(s, pitch_hz, blows, dulled)
    edge = amp(edge_db + edge_follows * (grit_db - roar_db)) * excite(blows, colour(GRIT_COLOUR))
    thump = amp(thump_db) * excite(thuds, twice(low_modes))
    thud = amp(thud_trim_db) * excite(thuds, colour(RUMBLE_COLOUR))  # through the rider
    return hush * roar + low + grit + jolt_ring + edge + thump + thud


def scene():
    """Add up all sources; each moment of the rattles and cracks favours other resonances."""
    board = deck() + bearings()
    rattling = patchy(trucks() + cracks(), depth_db=3, size=5)
    return (board + rattling + lingering() + fizz() + bumps(wind()) + street())[None]


def record(dry):
    """The microphone has a narrow dip, rounds off loud peaks and keeps nothing above its band limit."""
    dip_hz, dip_width_hz, dip_depth = 1870, 120, 0.47
    ceiling, top_hz = .7, 15719
    x = filtered(dry[0], lambda hz: 1 - dip_depth * np.exp(-((hz - dip_hz) / dip_width_hz) ** 2))
    x = x / (1 + np.abs(x / ceiling) ** 4) ** (1 / 4)
    return filtered(x, lambda hz: hz < top_hz)[None]


dry = scene()
out = record(dry)
put_to_file(out)
```